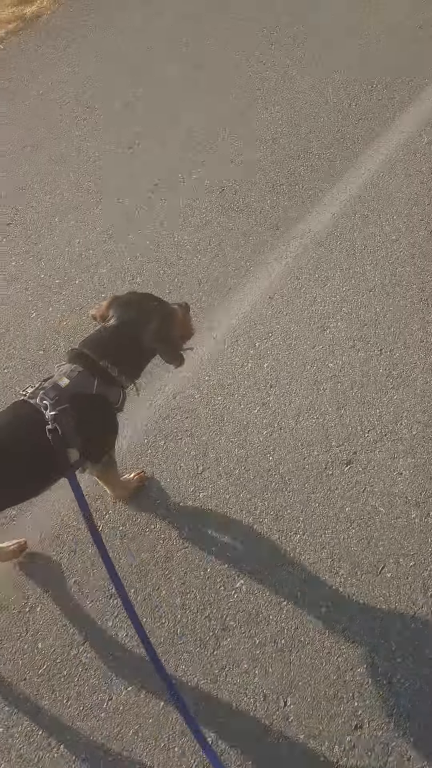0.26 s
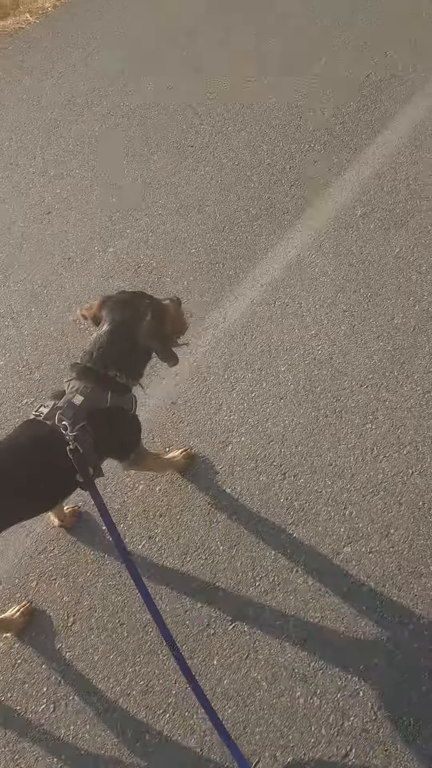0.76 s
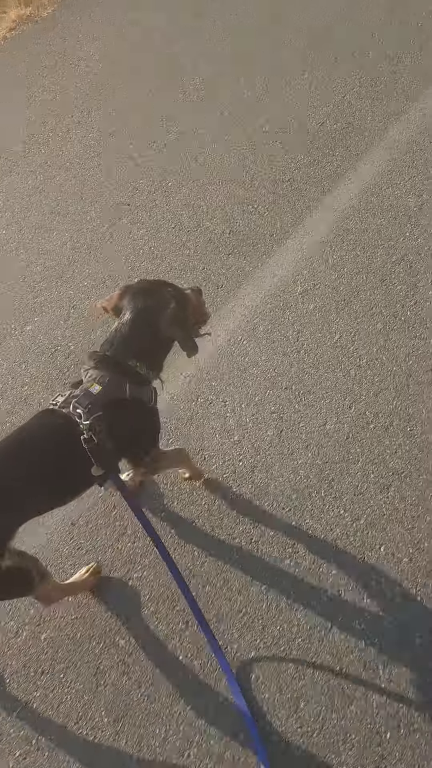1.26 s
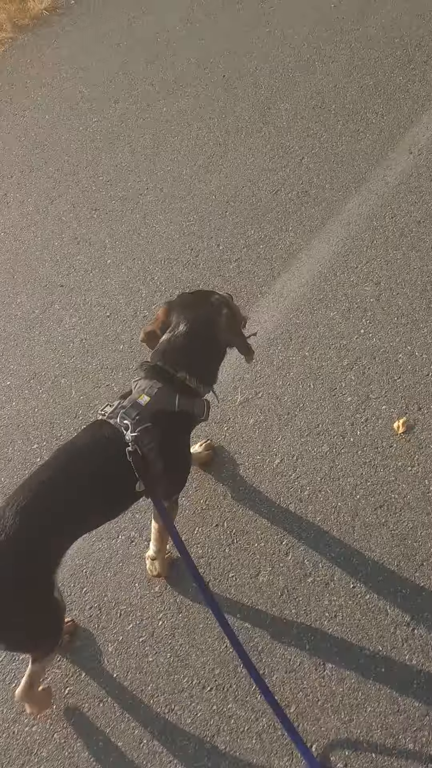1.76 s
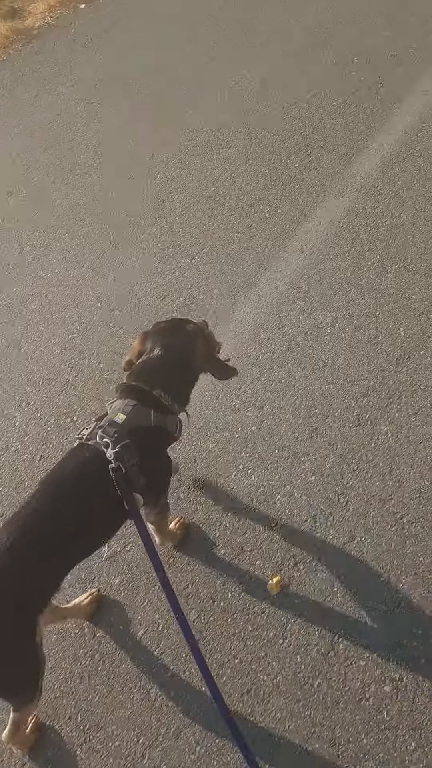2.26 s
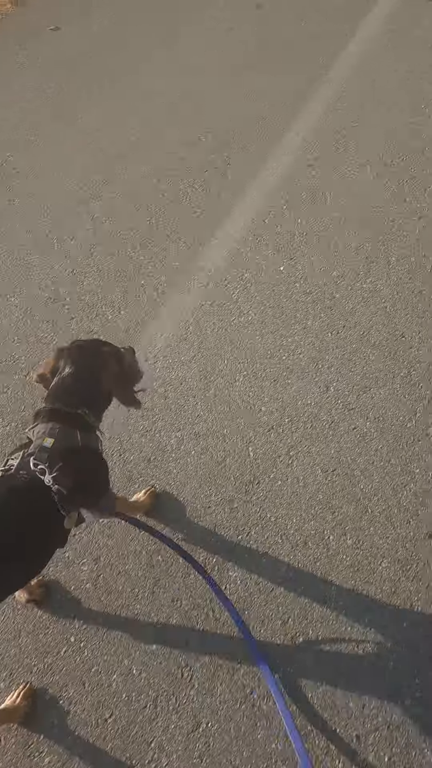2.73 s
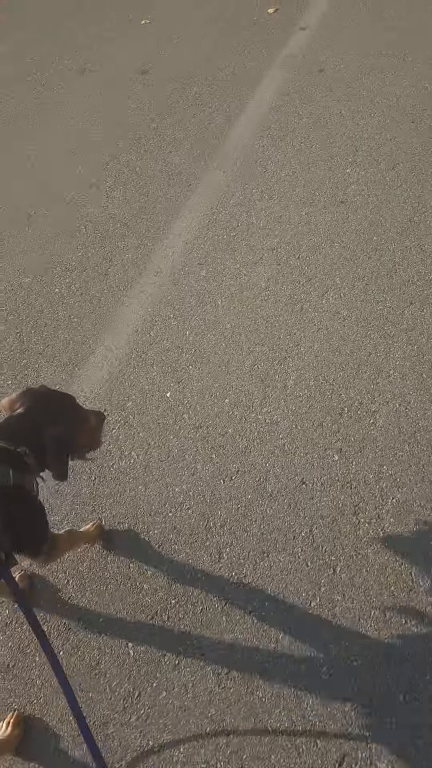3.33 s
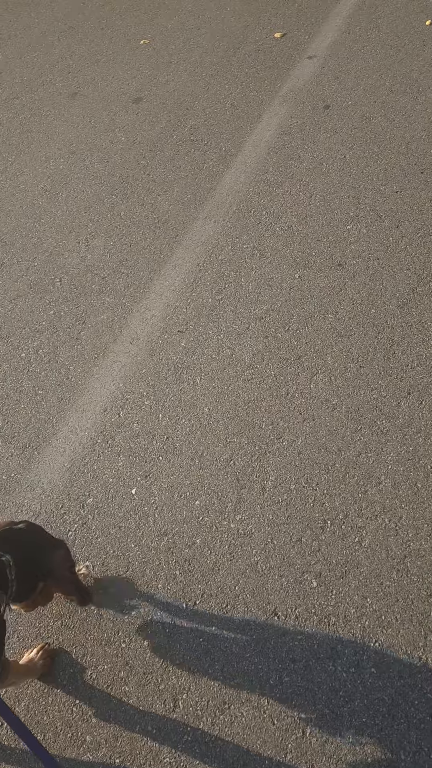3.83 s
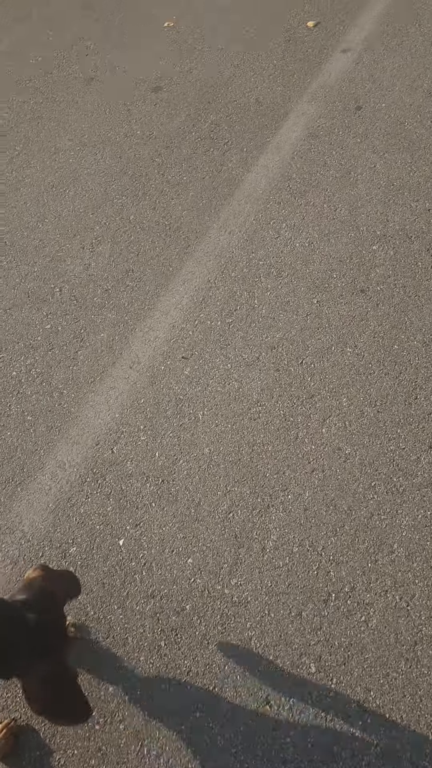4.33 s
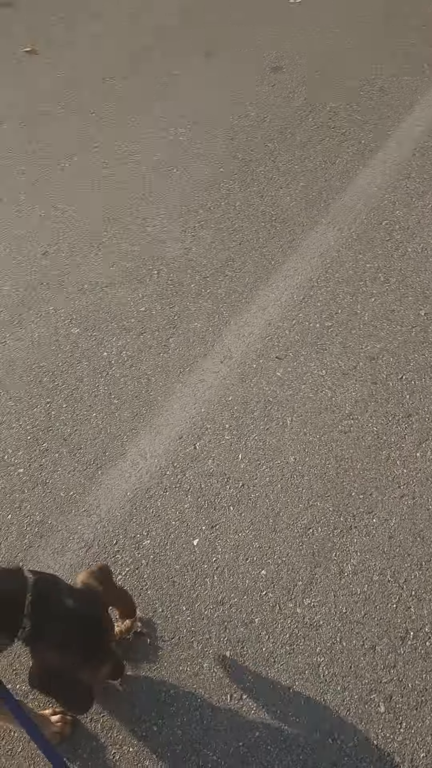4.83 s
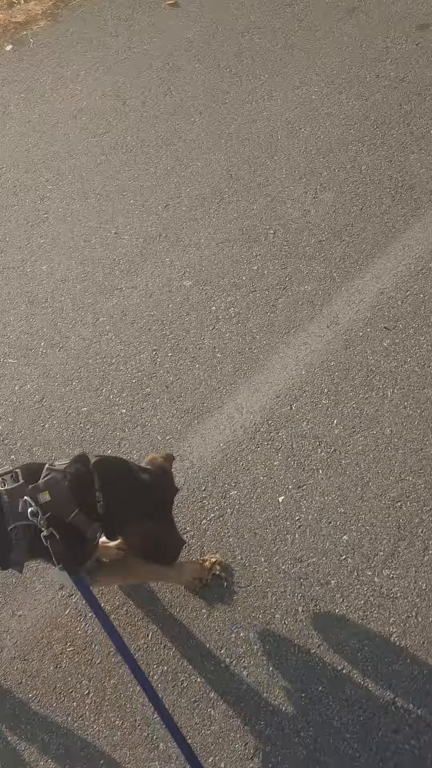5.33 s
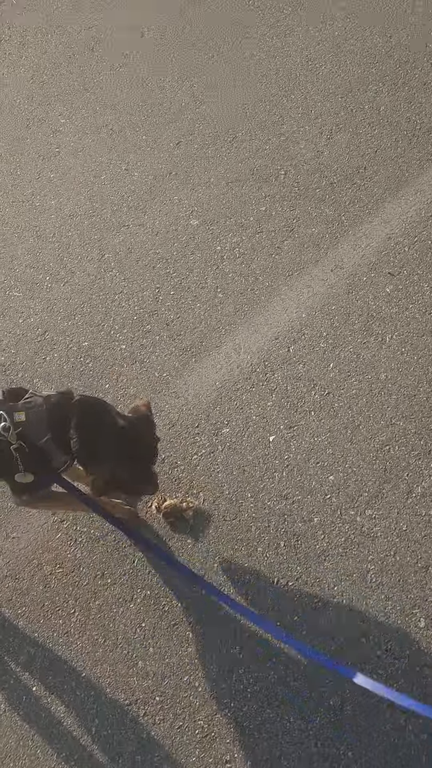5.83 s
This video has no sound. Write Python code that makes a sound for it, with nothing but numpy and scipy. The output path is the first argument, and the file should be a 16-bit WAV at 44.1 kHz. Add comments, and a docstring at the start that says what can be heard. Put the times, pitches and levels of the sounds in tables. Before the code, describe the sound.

Outdoors on pavement, a close stereo phone microphone catches metal dog harness fittings jingling in short, bright, muffled-off clinks, mostly in the right channel. Faint claw ticks, webbing rustle and dull thuds fill the gaps. Clinks crowd the start and again around 3.7 to 4 seconds, then thin out as an approaching car's soft roar swells toward the centre.

```python
"""The snap hook of a dog's leash knocks against the harness ring, close to the right port of a phone.
Each knock is a chatter of noise bursts, ring modes that die on touching webbing, and a thud along the leash.
Smaller fittings chime on as decaying modes; claws, grit and buckles tick, webbing rustles, dull knocks fall.
A car, made of resonant noise, nears from the left to the front and just passes its nearest point,
over the rumble of distant traffic and a faint hiss."""
import sys
import numpy as np
from scipy import signal
from scipy.io import wavfile
from scipy.ndimage import uniform_filter1d, map_coordinates

SR = 44100
rng = np.random.default_rng(int(sys.argv[2]) if len(sys.argv) > 2 else 0)


def wav_out(sig):
    """Save sig, one row per channel (or a flat mono array), as 16-bit PCM at SR to the path in sys.argv[1]."""
    wavfile.write(sys.argv[1], SR, np.round(np.clip(np.atleast_2d(sig).T, -1, 1) * 32767).astype(np.int16))


N = 268565
TIME = np.arange(N) / SR

# Rumble of car and distant traffic. Each row: time in seconds, level in dB.
RUMBLE_LEVEL = [(0, -48.5), (2.1, -50), (4.1, -45.5), (4.6, -47), (6.09, -42)]
# Rumble resonances. Each row: centre in Hz, width in Hz, relative level in dB.
RUMBLE_MODES = [(39.7, 39, -7), (66.7, 29.4, 1), (113.1, 43, -1), (160, 81, -4.5), (252, 85.6, -6.5)]
# Tyre roar resonances. Each row: centre in Hz, width in Hz, relative level in dB.
ROAR_MODES = [(1078, 327, -2), (1376, 423, 0), (2090, 980, -0.5)]
# The car's bearing. Each row: time in seconds, lead of the left port in ms, echo delay at the right port in ms.
BEARING = [(0, 0.26, 0.13), (4.5, 0.32, 0.16), (5.1, 0.087, 0.15), (5.6, 0.026, .19), (6.09, 0.012, 0.21)]
# Modes of a dull knock. Each row: pitch in Hz, relative level in dB, time to fall 60 dB in seconds.
KNOCK_MODES = [(76.7, -6, 0.13), (215.7, 0, 0.039), (1090, -10, 0.033)]
# Dull knocks, perhaps shoes or the leash handle.
# Each row: start in seconds, level in dB, hardness as dB of tilt from mode to mode.
KNOCKS = [(0.416, -43, -2), (.937, -37.5, -4), (2.545, -40, -5), (3.392, -32, 1), (3.561, -43.5, -20.5),
          (3.839, -36.5, 4), (3.952, -30, 8), (4.118, -32, 10), (4.14, -28.5, 7), (4.305, -30, 11)]
# Dry ticks of claws, grit and plastic buckles. Each row: start in seconds, level in dB, centre in Hz.
TICKS = [(0.1075, -44, 9000), (.217, -62, 8000), (.225, -61, 9970), (0.2706, -46, 9000), (0.304, -55, 7000),
         (.4, -54, 7000), (0.421, -44.5, 8900), (0.547, -49, 7900), (.624, -43, 8200), (.72, -43, 7000),
         (.7698, -49, 7600), (0.9455, -40.5, 8100), (.9909, -48, 5400), (1.07, -43, 12600),
         (1.2519, -42.5, 6300), (1.5894, -42.5, 9500), (1.675, -51, 7000), (1.917, -39.5, 7800),
         (2.095, -49, 6300), (2.286, -53.5, 9000), (2.402, -48, 9000), (2.325, -53, 11000),
         (2.479, -60, 6000), (2.489, -59, 6000), (2.5606, -52, 7200), (2.5668, -38.5, 10740),
         (2.8783, -43.5, 5700), (2.9071, -39, 8250), (3.0568, -46.5, 8000), (3.0957, -44, 9000),
         (3.124, -42.5, 6900), (3.2747, -41.5, 6800), (3.453, -45, 7200), (3.741, -36, 7600),
         (3.845, -47, 10000), (3.8684, -46.5, 5160), (3.8881, -36.5, 6760), (3.894, -45, 7050),
         (4.0786, -41, 9100), (4.115, -42, 10400), (4.6089, -43, 6860), (4.6472, -37, 11800),
         (4.939, -50, 9000), (5.509, -37.5, 8000), (5.565, -41, 4670), (5.614, -38, 10400),
         (5.79, -55, 8900)]
# Modes of the smaller fittings, by name. Each row: pitch in Hz, relative level in dB, 60 dB decay in seconds.
FITTING_MODES = {"tag": [(6476, 0, .17), (11360, -2, .12), (12420, -3, .07), (15390, -16, .1)],
                 "swivel": [(9045, 0, .2), (15040, -16, .15)], "slider": [(8420, 0, .06), (8820, -3, .09)],
                 "buckle": [(3750, -14, .06), (10190, -7, .25), (11680, 0, .12), (12320, -9, .06),
                 (14860, -12, .15)]}
# Chimes of those fittings. Each row: start in seconds, fitting, level in dB, free ringing in seconds.
CHIMES = [(0.041, "swivel", -43, 0.015), (.186, "swivel", -42, 0.019), (0.185, "slider", -25.5, 0.0033),
          (.248, "swivel", -42, 0.027), (.344, "swivel", -40, 0.018), (.35, "tag", -61, .095),
          (.696, "slider", -59, .023), (0.781, "slider", -45, .045), (.782, "tag", -67, .047),
          (.864, "slider", -43.5, .024), (1.001, "swivel", -41.5, .025), (1.311, "tag", -45.5, 0.087),
          (1.631, "slider", -50.5, .025), (2.243, "slider", -33, .027), (2.303, "slider", -46, .049),
          (2.413, "buckle", -38, .15), (2.428, "swivel", -54, 0.021), (2.75, "tag", -48, 0.073),
          (2.925, "buckle", -45.5, .071), (3.055, "buckle", -45, .09), (3.355, "swivel", -41, .051),
          (3.355, "tag", -47, .035), (3.55, "swivel", -49, 0.066), (3.712, "swivel", -29.5, .068),
          (3.769, "swivel", -29, 0.012), (4.58, "swivel", -53, .071), (4.881, "slider", -44, 0.047)]
# Dull bumps of the hook on webbing, felt through the leash.
# Each row: start in seconds, level in dB, pitch in Hz.
BUMPS = [(0.043, -38.5, 503), (0.202, -34, 1400), (0.2349, -24, 1580), (.2613, -29.5, 1300),
         (.292, -31.5, 1800), (.343, -32.5, 517), (.349, -30, 343), (1.2145, -25.5, 2180),
         (1.227, -32.5, 1490), (2.3006, -36, 700), (2.4259, -27.5, 1500), (2.5106, -31.5, 495),
         (3.3135, -36.5, 596), (3.7687, -28, 508), (3.9545, -32, 910), (4.6308, -24, 550),
         (4.8794, -28, 450)]
# Ring modes above the lowest; close pairs beat.
# Each row: ratio to the ring pitch, relative level in dB, 60 dB decay in seconds.
RING_MODES = [(1.0, 0, .05), (1.018, -8, .04), (1.031, -13, .03), (1.221, -24, .03), (.72, -22, .012),
              (.81, -22, .01)]
# Hook on ring. Each row: start in seconds, crack level in dB, ring level in dB, ring pitch in Hz,
# free ringing in seconds, level of the lowest mode in dB.
CLINKS = [(.041, -27.5, -23.5, 11900, .018, -58), (0.058, -42, -37, 12050, .007, -70),
          (0.1845, -23.5, -17.5, 12000, 0.0063, -41), (0.2335, -23, -26, 12200, .004, -33),
          (0.2378, -20, -10, 11640, 0.0084, -27.5), (.2476, -57, -35.5, 11630, .003, -62),
          (.2613, -54, -34.5, 11600, .009, -50), (0.278, -30, -27, 11920, .0048, -35),
          (0.29, -39, -42, 12300, 0.0045, -55), (.343, -23, -15, 11960, 0.0073, -28.5),
          (0.35, -47, -22, 11700, 0.012, -45), (.359, -56, -27, 12300, 0.011, -59),
          (0.6952, -28, -19.5, 11850, 0.0056, -44), (.782, -37, -39.5, 11750, 0.028, -45),
          (0.8636, -34.5, -43, 11440, 0.024, -49), (1, -38, -29, 11850, .008, -46),
          (1.0604, -31.5, -31.5, 11560, .005, -43), (1.2134, -31.5, -27.5, 12050, .006, -36.5),
          (1.2285, -42, -32, 11970, 0.0097, -36.5), (1.3098, -32, -34.5, 12000, .0065, -44.5),
          (1.6308, -40, -43, 11800, .01, -47.5), (1.683, -37.5, -40, 12000, 0.0038, -45.5),
          (1.8768, -32, -25, 11720, 0.0061, -28), (2.2446, -27.5, -23.5, 11960, 0.042, -44),
          (2.2996, -26.5, -10, 11600, 0.014, -16.5), (2.411, -41, -30, 11680, .015, -42),
          (2.4264, -25.5, -23.5, 12100, 0.009, -29), (2.438, -44, -35.5, 11690, .019, -45),
          (2.471, -58, -48, 11670, .008, -53), (2.5121, -53, -21.5, 11700, 0.018, -32),
          (2.5234, -33, -26.5, 11730, 0.006, -32), (2.7486, -32, -36, 11950, .013, -43),
          (3.1375, -33.5, -32, 11850, 0.0084, -36.5), (3.3536, -21.5, -20.5, 11940, .019, -37),
          (3.3949, -31, -25.5, 11500, .017, -31.5), (3.4072, -30, -29, 11950, 0.013, -33.5),
          (3.4861, -32, -28.5, 11840, 0.003, -46), (3.5427, -50, -30, 12900, 0.0054, -41),
          (3.5483, -23.5, -25.5, 11670, 0.013, -30), (3.6042, -39.5, -38, 12000, 0.0043, -53),
          (3.712, -22, -20.5, 11890, .019, -35), (3.7533, -27, -35.5, 12400, .009, -39),
          (3.761, -33, -29.5, 11800, 0.0083, -39), (3.7689, -17, -13, 11670, 0.0084, -22),
          (3.9541, -38.5, -35, 11600, .022, -33.5), (3.976, -28, -14.5, 11850, .016, -31),
          (3.9887, -33.5, -25, 11900, .0054, -37), (4.2261, -31, -29.5, 11320, .039, -59),
          (4.4978, -23.5, -15, 11780, 0.019, -35), (4.579, -39.5, -42, 11600, .009, -47),
          (4.6308, -22, -23, 11700, 0.0058, -26), (4.7207, -34, -30, 11960, 0.0054, -36),
          (4.7422, -28, -30.5, 12160, .007, -39), (4.8791, -22.5, -24, 11550, 0.0068, -32),
          (5.0597, -37, -36, 12000, 0.0044, -50), (5.1933, -44, -46, 11770, 0.0042, -42),
          (5.693, -41, -46, 11700, 0.0044, -39.5), (5.353, -36.5, -32.5, 12000, 0.0049, -51),
          (5.657, -41, -39, 12100, 0.0053, -50)]

AIR_DB = -76.5
# the car's straight path past the phone: speed, time of the nearest point, distance there
SPEED_M_S, PASSES_S, KERB_M = 6.27, 5.27, 7.62
GROUND_LOSS_DB_PER_M = 0.3545
ROAR_DB, HISS_DB, LOW_DB = -37, -52.5, -47.5  # at the nearest point, before filtering and shading
HISS_FADE, LOW_FADE = 0.94, 0.17  # dB lost for each dB that the roar loses
LOW_SHADE_DB_PER_MS, HISS_SHADE_DB_PER_MS = -36, -14.5  # shading while the left port leads
ROAR_EDGE_HZ = 2235
CAR_PAN_DB = -2  # left minus right
ECHO_SHARE = .7  # gain of the close echo
RUSTLE_DB, RUSTLE_S = -54, 0.064  # right port level for a 0 dB contact, smoothing window
RUB_RING_DB = -3.5  # the ring whispers along in the rustle
TICK_PAN_DB, TICK_PAN_SPREAD_DB = -15, 4.5  # left minus right, standard deviation
FAINT_DB, FAINT_NEAR_S = -55.5, 0.043  # faint ticks: lowest level, mean distance from a listed contact
LEAD_S = .008  # room for contacts ahead of the main blow
DAMPED_T60_S = .012  # extra decay after the touch
LINGER_DB, LINGER_T60_S = -37, 0.16  # what still sings after the touch
THUD_DB = -6  # under the mean of crack and lowest mode
THUD_HZ, THUD_SPREAD, THUD_CYCLES = 469, 0.15, 10.4  # usual pitch, varying share, cycles to fall 60 dB
RING_LOWEST, RING_LOWEST_T60_S = 0.442, 0.031  # ratio to the ring pitch, free decay
FAR_TREBLE_DB, FAR_LOW_DB, FAR_SPLIT_HZ = -13.5, -16.5, 1401  # the metal at the left port
SCATTER_DB = -31.5
RING_LAG_MS, LAG_SWAY_MS = .49, .02
PORT_NOTCH_HZ, PORT_NOTCH_WIDTH_HZ, PORT_NOTCH_DEPTH = 10400, 1450, 0.49
TOP_HZ = 16600


def undb(db):
    """Gain of a level in dB."""
    return 10 ** (np.asarray(db) / 20)


def unit(x):
    """Scales to rms 1."""
    return x / np.sqrt(np.mean(x ** 2))


def smooth_twice(x, first, second):
    """Two moving averages, lengths in samples."""
    return uniform_filter1d(uniform_filter1d(x, first), second)


def band(x, hz, width_hz):
    """Two-pole resonance, gain 1 at its centre."""
    return signal.lfilter(*signal.iirpeak(min(hz, .45 * SR), hz / width_hz, fs=SR), x)


def walk(rate):
    """Random levels held 1 / rate s and slewed twice; spread near 1."""
    k = int(SR / rate)
    steps = np.repeat(rng.standard_normal(N // k + 1), k)
    return 2.05 * smooth_twice(steps, k, k)[:N]


def add(out, s, sound):
    """Mixes a short sound in at time s."""
    i = int(s * SR)
    out[..., i:i + sound.shape[-1]] += sound[..., :N - i]


def delay(x, ms):
    """Reads x a moving time ago."""
    return map_coordinates(x, [np.arange(N) - ms * SR / 1000], order=3)


def sing(hz, db, t60, free, phase=0.):
    """One mode: rings freely but unevenly, as loose metal keeps brushing it, then mostly dies on the touch."""
    t = TIME[:5200]
    touched = np.maximum(t - free, 0)
    fall = undb(-60 * t / t60) * undb(-60 * touched / DAMPED_T60_S)
    fall += undb(LINGER_DB - 60 * t / LINGER_T60_S)
    brush_db = 2.1 * unit(smooth_twice(rng.standard_normal(len(t)), 120, 60))
    onset = np.minimum(t / 0.00066, 1)
    return undb(db + brush_db) * fall * np.sin(2 * np.pi * hz * t + phase) * onset


def burst(hz, width_hz, decay_s):
    """Band noise of rms near 1 at its onset, dying away with a faint scattered tail."""
    t = TIME[:2000]
    noise = unit(band(rng.standard_normal(len(t)), hz, width_hz))
    return noise * (np.exp(-t / decay_s) + undb(-25) * np.exp(-t / .005))


def chatter(hz, width_hz, decay_s, count):
    """One blow, LEAD_S into the sound, among weaker contacts: metal slides in before it and bounces after."""
    out = np.zeros(3600)
    add(out, LEAD_S, burst(hz, width_hz, decay_s))
    for early, gap, size, colour in rng.random((count, 4)):
        shift_s = -LEAD_S * gap if early < .45 else 0.019 * gap
        db = -5 - 12 * size - 800 * abs(shift_s)
        contact = burst(hz * (.6 + colour), .6 * width_hz, 1.5 * decay_s)
        add(out, LEAD_S + shift_s, undb(db) * contact)
    return out


def thud(out, s, db, hz):
    """A dull blow carried along the leash: one short mode and a soft noise burst."""
    add(out, s - .001, sing(hz, db, THUD_CYCLES / hz, 1))
    add(out, s - .0005, undb(db - 3.5) * burst(1200, 1000, 0.0016))


def air():
    """Faint hiss of the outdoors and the microphones, unrelated at the two ports."""
    return undb(AIR_DB) * unit(band(rng.standard_normal((2, N)), 5000, 11000))


def resonant(modes, flicker_db):
    """Maker of noise in resonances, each flickering alone."""
    gains = [undb(db + flicker_db * walk(9)) for hz, width, db in modes]

    def make():
        total = np.zeros(N)
        for gain, (hz, width, db) in zip(gains, modes):
            once = band(rng.standard_normal(N), hz, 1.54 * width)  # two passes narrow it back to the width
            total += gain * unit(band(once, hz, 1.54 * width))
        return unit(total)
    return make


def wide(make, likeness, lead_ms):
    """A direct part that reaches the left port first, plus a scattered part of its own at each port."""
    direct = make()
    late = delay(direct, lead_ms)
    scattered = np.array([make(), make()])
    likeness = np.clip(likeness, 0, 1)
    return np.sqrt(likeness) * np.array([direct, late]) + np.sqrt(1 - likeness) * scattered


def road():
    """Tyre roar, low roar and hiss fade with distance, over rumble; the nearer, the more direct both roars."""
    metres = np.hypot(SPEED_M_S * (TIME - PASSES_S), KERB_M)
    loss_db = 20 * np.log10(metres / KERB_M) + GROUND_LOSS_DB_PER_M * (metres - KERB_M)
    s, *columns = np.transpose(BEARING)
    lead_ms, echo_ms = (np.interp(TIME, s, c) for c in columns)
    near = np.clip(0.9 - loss_db / 20, 0, 1)

    roar = undb(ROAR_DB - loss_db) * wide(resonant(ROAR_MODES, 1.13), .5 + 0.45 * near, lead_ms)
    # ground absorption ends the roar sharply
    roar = signal.sosfilt(signal.butter(6, ROAR_EDGE_HZ, fs=SR, output="sos"), roar)

    low_noise = resonant([(479, 260, 0.053), (739, 160, 0.83)], 2.2)
    low_db = LOW_DB - LOW_FADE * loss_db + LOW_SHADE_DB_PER_MS * lead_ms
    low = undb(low_db) * wide(low_noise, 0.27 + 0.66 * near, lead_ms)

    hiss_noise = resonant([(2960, 660, 4.5), (4030, 1200, 1), (6000, 3400, -5)], 0.54)
    hiss_db = HISS_DB - HISS_FADE * loss_db + HISS_SHADE_DB_PER_MS * lead_ms
    hiss = undb(hiss_db) * wide(hiss_noise, 0.31, lead_ms)

    rumble = wide(resonant(RUMBLE_MODES[:3], 0.66), 1.0, 0)
    rumble += undb(-4.5) * wide(resonant(RUMBLE_MODES[3:], 2.0), .93, 0.18 * lead_ms)

    car = (roar + low + hiss) * undb(np.array([[CAR_PAN_DB], [-CAR_PAN_DB]]) / 2)
    # a close echo off hand and phone cuts a notch that mostly sinks as the car comes round
    car[1] = (car[1] + ECHO_SHARE * delay(car[1], echo_ms)) * undb(-3.5)
    car[1] += 2.5 * lead_ms * band(car[1], 2930, 900)  # from the side, sound bends round the phone brighter
    return car + undb(np.interp(TIME, *np.transpose(RUMBLE_LEVEL))) * rumble


def knocks():
    """Three damped modes each, alike at both ports; the lower the mode, the later it swings up."""
    out = np.zeros(N)
    for s, db, tilt_db in KNOCKS:
        for step, (hz, mode_db, t60) in zip((-1, 0, 1), KNOCK_MODES):
            add(out, s + 1 / hz, sing(hz, db + mode_db + step * tilt_db, t60, 1))
    return out


def rustle():
    """Webbing and fur rub in fine grains while the hook swings, the more the harder it lands."""
    swing = np.zeros(N)
    for s, db, *_ in CLINKS + TICKS:
        swing[int(s * SR)] = undb(db / 2)
    k = int(RUSTLE_S * SR)
    swing = k * smooth_twice(swing, k, k)
    grain = undb(4.3 * walk(120) + 2.8 * walk(25.06))
    noise = rng.standard_normal((2, N))
    rub = unit(band(noise, 5500, 9000)) + undb(RUB_RING_DB) * unit(band(noise, 12000, 1500))
    return undb([[RUSTLE_DB - 6.5], [RUSTLE_DB]]) * swing * grain * rub


def ticks():
    """Noise bursts: listed ticks, and fainter ones scattered at random round the contacts."""
    out = np.zeros((2, N))
    for s, db, hz in TICKS:
        pan_db = TICK_PAN_DB + TICK_PAN_SPREAD_DB * rng.standard_normal()
        add(out, s - LEAD_S, undb([[db + pan_db], [db]]) * chatter(hz, hz, .0013, count=3))
    contacts = [row[0] for row in CLINKS + TICKS]
    for which, shift, size, colour, side in rng.random((130, 5)):
        s = abs(contacts[int(which * len(contacts))] + FAINT_NEAR_S * 2 * (2 * shift - 1))
        db = FAINT_DB - 4.6 * np.log(size + 1e-3)  # few are loud
        add(out, s, undb([[db - 16 * side], [db]]) * burst(4500 + 7000 * colour, 8000, 0.00027))
    return out


def chimes(out, chest):
    """Smaller fittings ring in their own modes; the buckle hangs in front, at the chest."""
    for s, name, db, free in CHIMES:
        chime = sum(sing(hz, db + mode_db, t60, free) for hz, mode_db, t60 in FITTING_MODES[name])
        add(chest if name == "buckle" else out, s, chime)


def clinks(out):
    """Hook on ring: a crack, the ring's modes until the touch, and a thud through the leash."""
    for s, crack_db, ring_db, hz, free, lowest_db in CLINKS:
        chance = rng.standard_normal((len(RING_MODES), 2))
        ring = 0
        for (ratio, db, t60), (u, v) in zip(RING_MODES, chance):
            vary_db = 1.06 * u * (ratio != 1)
            ring = ring + undb(ring_db) * sing(hz * ratio, db + vary_db, t60, free, 3 * v)
        lowest_hz = hz * RING_LOWEST
        ring += sing(lowest_hz, lowest_db, RING_LOWEST_T60_S, free)
        partner_hz = (1 + .05 * chance[0, 0]) * lowest_hz
        ring += sing(partner_hz, lowest_db - 9, RING_LOWEST_T60_S / 2, free)
        hook_hz = (0.99 + 0.029 * chance[0, 1]) * lowest_hz  # the hook's own mode
        ring += sing(hook_hz, lowest_db - 13.5, RING_LOWEST_T60_S / 3, free)
        add(out, s, ring)
        add(out, s - LEAD_S, undb(crack_db) * chatter(7000, 14000, .0007, count=5))
        thud_hz = THUD_HZ * (1 + THUD_SPREAD * chance[0, 0])
        thud(out, s, (crack_db + lowest_db) / 2 + THUD_DB, thud_hz)


def fittings():
    """All metal near the right port; it reaches the left port weaker, later and partly scattered."""
    out, chest = np.zeros(N), np.zeros(N)
    clinks(out)
    for s, db, hz in BUMPS:
        thud(out, s, db, hz)
    chimes(out, chest)
    low = signal.lfilter(*signal.butter(1, FAR_SPLIT_HZ, fs=SR), out)
    far = undb(FAR_LOW_DB) * low + undb(FAR_TREBLE_DB) * (out - low)
    far = delay(far, RING_LAG_MS + LAG_SWAY_MS * walk(5.7))
    # hand and ground scatter some round
    paths = rng.standard_normal(400) * np.exp(-TIME[:400] / 0.0018)
    far += undb(SCATTER_DB) * signal.fftconvolve(out, paths / np.linalg.norm(paths))[:N]
    return np.array([far + undb(-9) * chest, out + chest])


def scene():
    """Everything at the two ports, left and right."""
    return air() + road() + knocks() + rustle() + ticks() + fittings()


def record(dry):
    """The ports dip near 10 kHz; the top is cut steeply."""
    ported = dry - np.clip(PORT_NOTCH_DEPTH, 0, 1) * band(dry, PORT_NOTCH_HZ, PORT_NOTCH_WIDTH_HZ)
    return signal.sosfilt(signal.ellip(10, .2, 70, TOP_HZ, fs=SR, output="sos"), ported)


dry = scene()
out = record(dry)
wav_out(out)
```